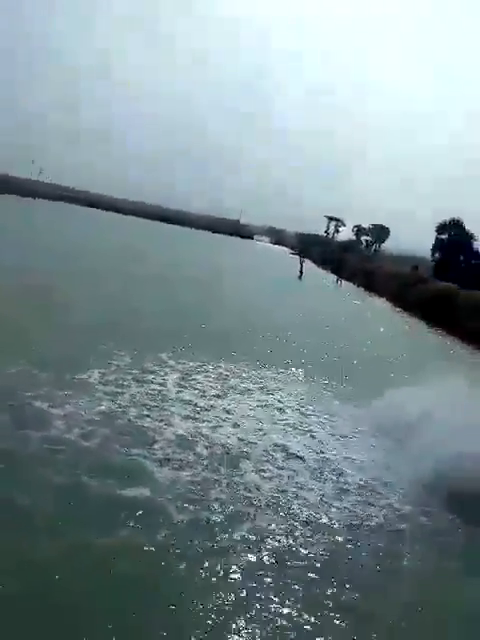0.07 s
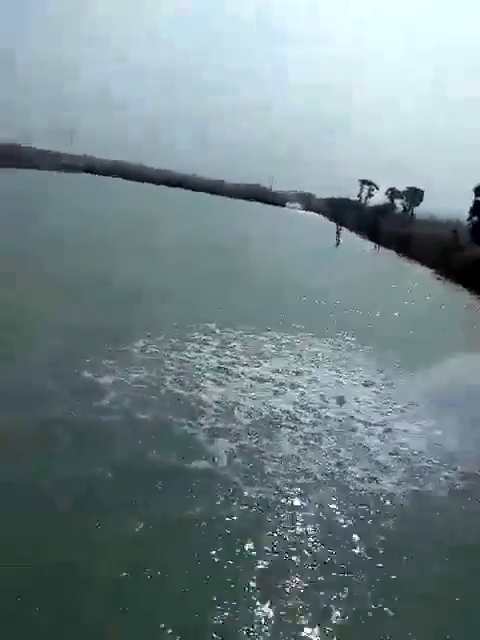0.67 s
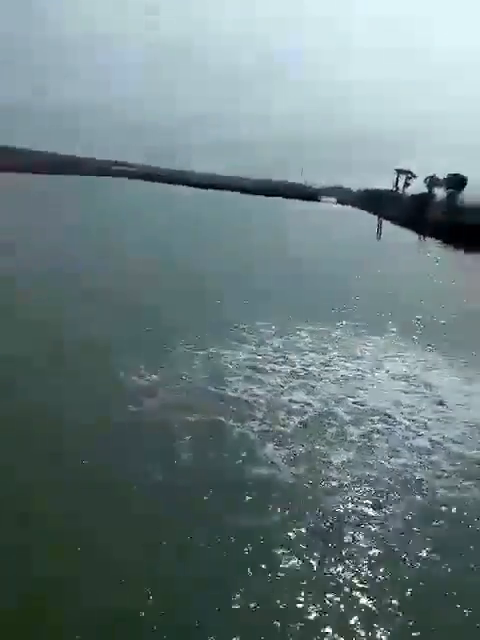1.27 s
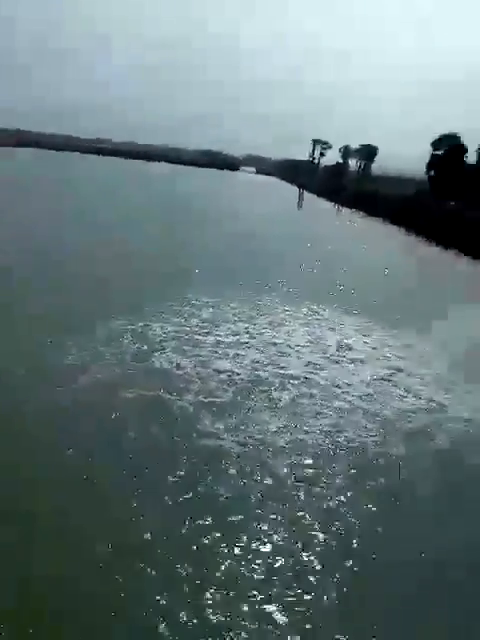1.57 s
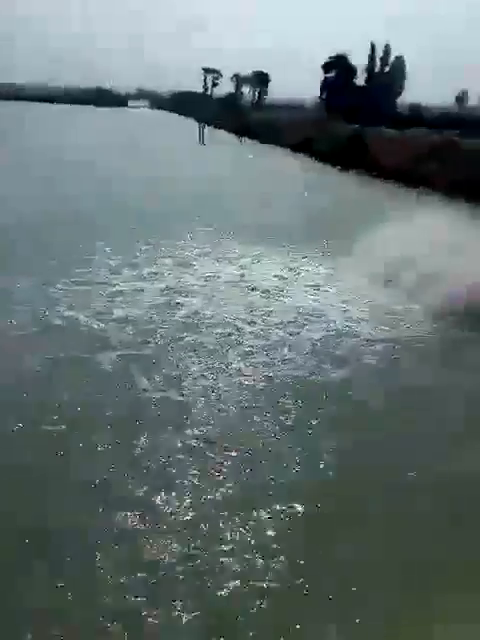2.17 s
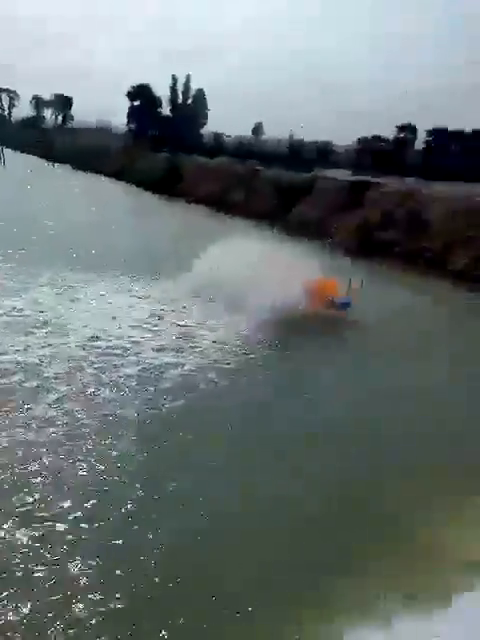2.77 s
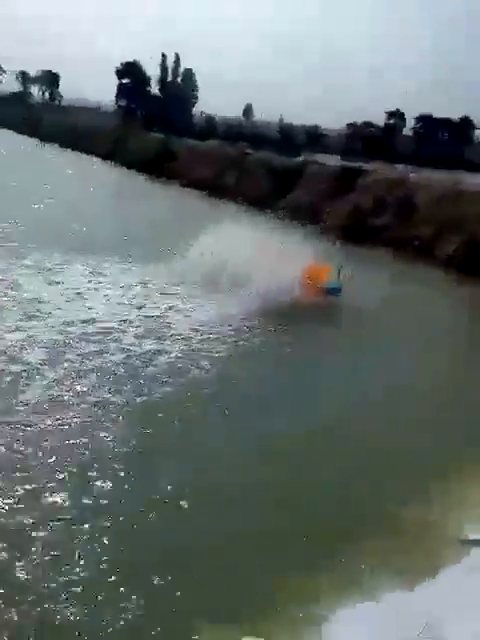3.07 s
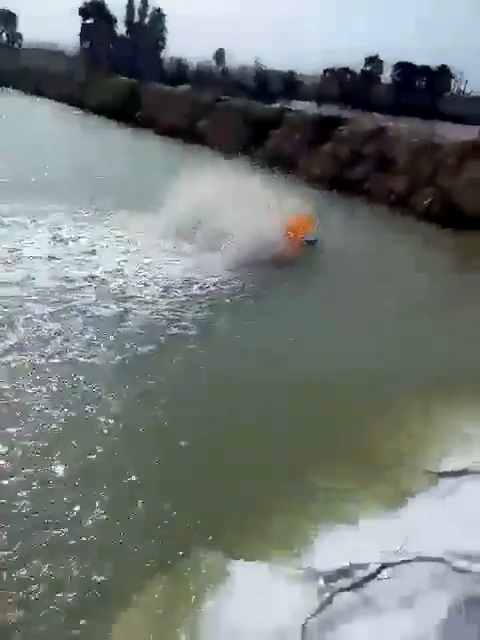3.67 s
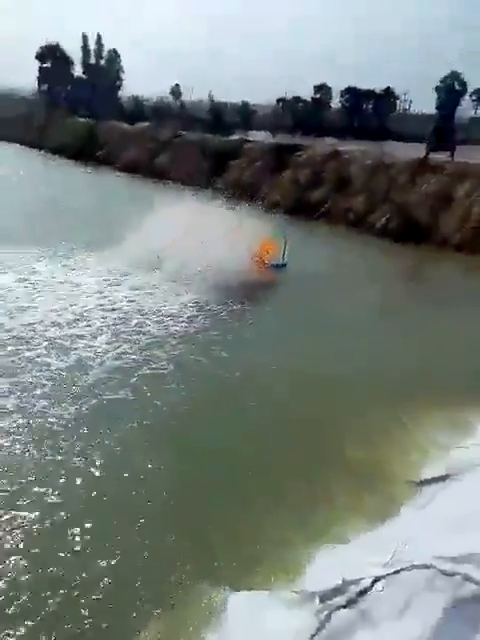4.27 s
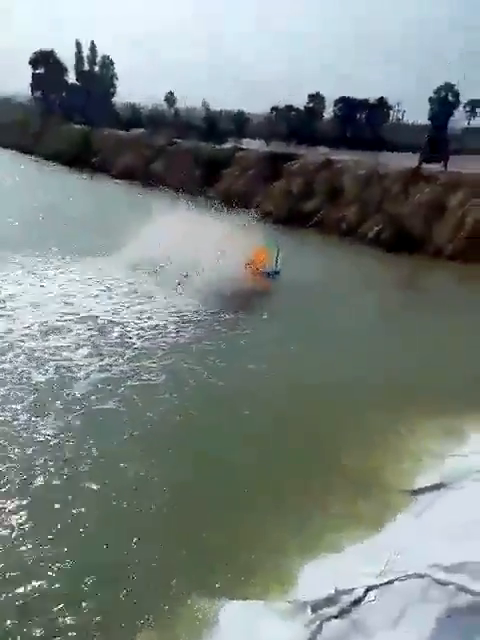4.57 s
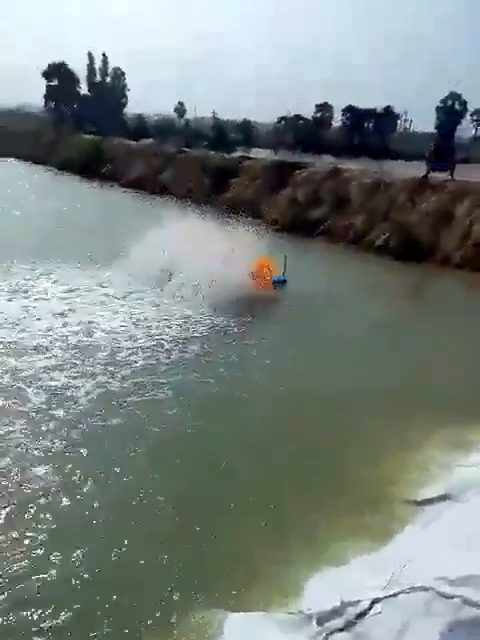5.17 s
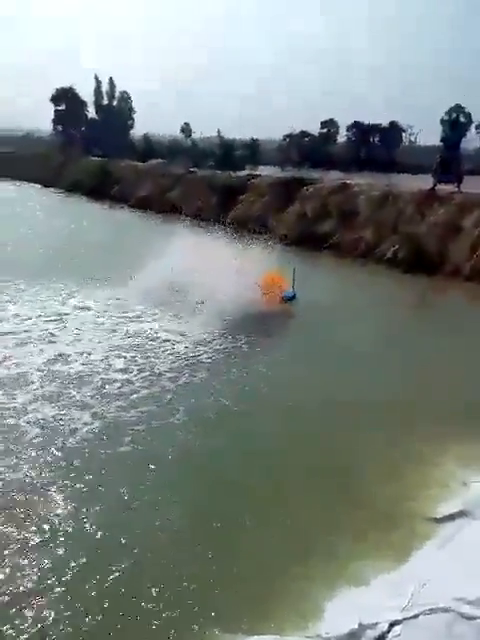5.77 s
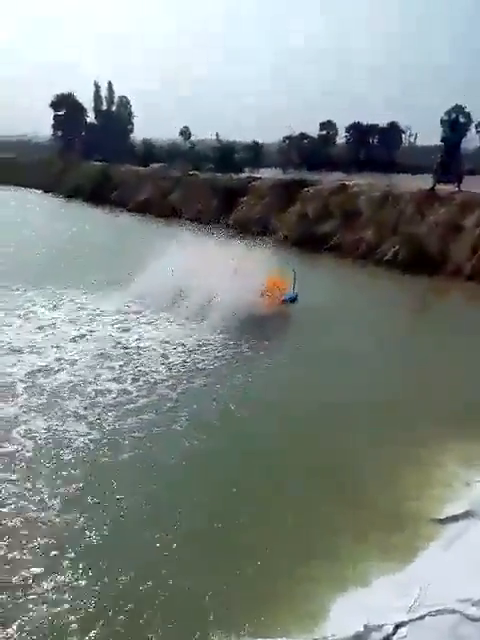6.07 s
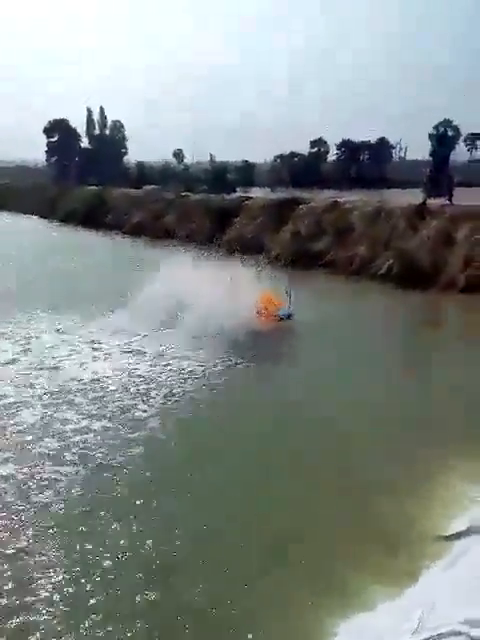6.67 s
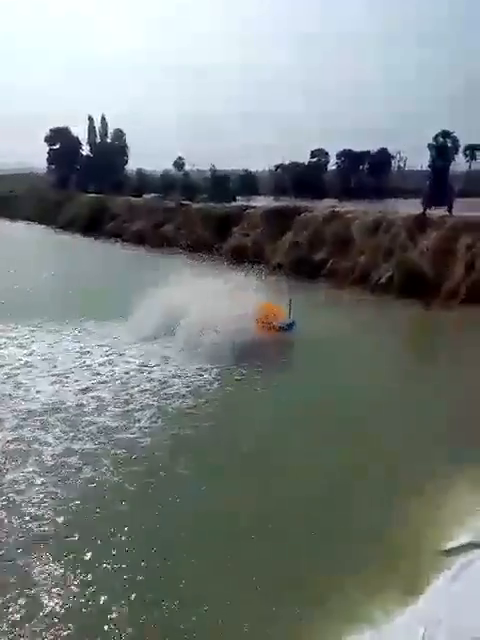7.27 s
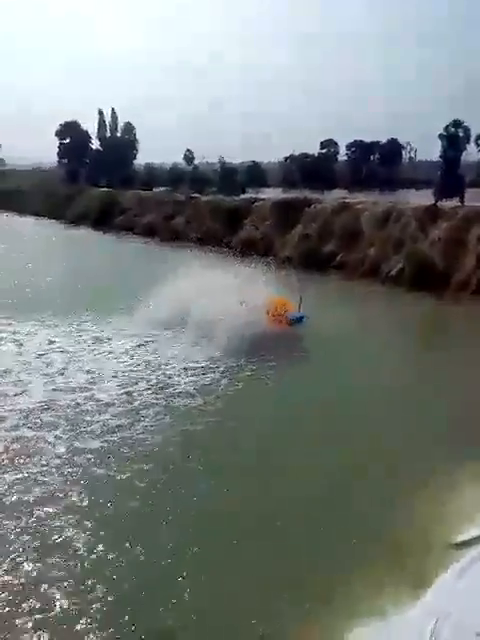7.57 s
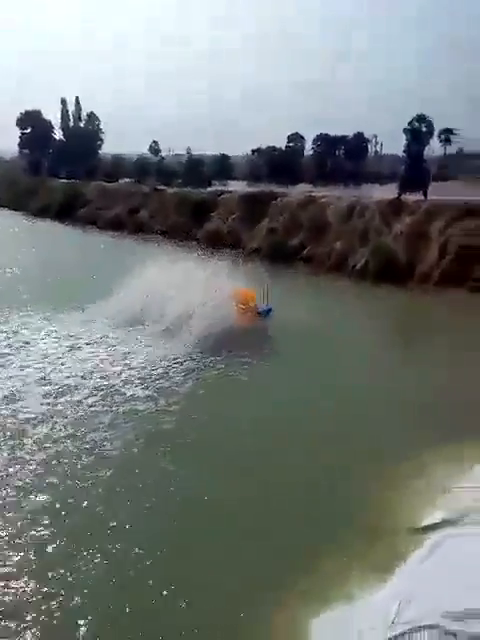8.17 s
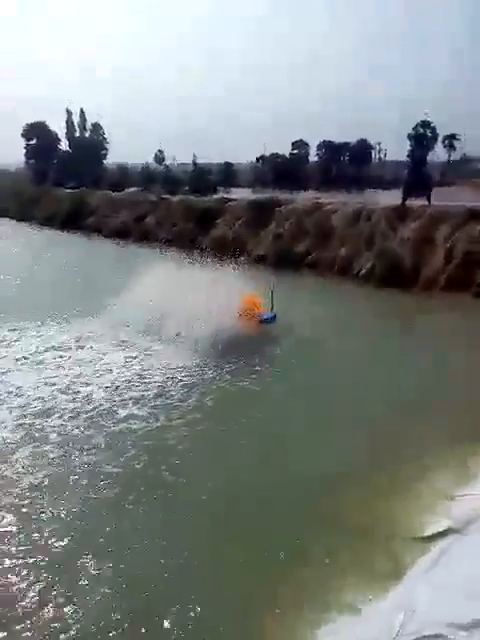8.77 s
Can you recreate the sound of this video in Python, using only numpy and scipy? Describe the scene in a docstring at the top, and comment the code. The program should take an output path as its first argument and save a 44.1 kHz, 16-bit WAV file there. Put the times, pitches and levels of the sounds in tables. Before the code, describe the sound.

Gusty wind rumbles and thuds on the microphone over the constant splashing and faint gear whine of a paddlewheel aerator.

```python
"""On the bank of a pond in strong wind, the microphone turning to a paddlewheel aerator on the water.
The paddles throw a steady hiss of spray and drops and beat in bubbles, over the whine of the gear drive.
Gusts buffet the microphone, hardest in the first three seconds, and the gain control ducks the water
under them."""
import sys
import numpy as np
from scipy import signal
from scipy.fft import rfft, irfft, next_fast_len
from scipy.io import wavfile
from scipy.ndimage import uniform_filter1d, map_coordinates

SR = 44100
rng = np.random.default_rng(int(sys.argv[2]) if len(sys.argv) > 2 else 0)


def pcm_store(signal):
    """Save signal as 16-bit PCM."""
    levels = np.round(np.clip(np.atleast_2d(signal), -1, 1) * 32767)
    wavfile.write(sys.argv[1], SR, levels.astype(np.int16).T)


N = 397341
TIME = np.arange(N) / SR


def amp(db):
    """Decibels to gain."""
    return 10 ** (np.asarray(db) / 20)


def unit_rms(x):
    """Scales to rms 1."""
    return x / np.sqrt(np.mean(x ** 2) + 1e-20)


def colour(x, spectrum):
    """Filters x by a spectrum drawn on a log-frequency axis; rms 1."""
    size = next_fast_len(N)
    hz, db = np.transpose(spectrum)
    gain = amp(np.interp(np.log(np.fft.rfftfreq(size, 1 / SR) + 1), np.log(hz), db))
    return unit_rms(irfft(rfft(x, size) * gain, size)[:N])


def wander(rate_hz):
    """Smooth random drift of rms 1 that moves up to about rate_hz."""
    step = 32
    size = N // step + 2
    hz = np.fft.rfftfreq(size, step / SR)
    slow = irfft(rfft(rng.standard_normal(size)) * np.exp(-(hz / rate_hz) ** 2), size)
    return np.interp(np.arange(N) / step, np.arange(size), unit_rms(slow))


def smooth(x, seconds):
    """Triangular running mean."""
    size = max(int(seconds * SR), 1)
    return uniform_filter1d(uniform_filter1d(x, size), size)


def lowpass(x, hz, order=2):
    """Butterworth low-pass."""
    return signal.sosfilt(signal.butter(order, hz, fs=SR, output="sos"), x)


def steady(x, seconds):
    """Takes out swells slower than the given time, leaving the quick ones."""
    return x / np.sqrt(abs(smooth(x ** 2, seconds)) + 1e-9)


def around(t, length):
    """The samples within three lengths of time t."""
    return slice(max(int((t - 3 * length) * SR), 0), int((t + 3 * length) * SR))


def wind_pressure(rise_share=0.47, steepness=4.5):
    """Wind level in dB at the microphone: each gust swells, holds and dies away on the mean wind."""
    # mean wind, strong at first, then a light breeze: t/s, level/dB
    breeze = [(0, -22), (.1, -19), (.15, -10), (.68, -11), (.77, -17), (.9, -10), (2.7, -10), (3.0, -18),
              (3.7, -24), (3.78, -45), (4.4, -37), (4.65, -29), (5.6, -29), (6.5, -38), (7.8, -42),
              (8.0, -27.5), (8.7, -34), (9.01, -22.5)]
    # gusts: crest t/s, level/dB, length/s
    gusts = [(0.176, -5, 0.089), (.42, -3, 0.04), (0.515, -3.5, 0.069), (0.842, -5.5, 0.045),
             (1.105, -7, .06), (1.261, -5, 0.075), (1.515, -3, .14), (1.909, -3, 0.077), (2.009, -.5, 0.14),
             (2.279, -3.5, .13), (2.506, -4, 0.042), (2.61, -4.5, .06), (2.804, 0, 0.072),
             (3.01, -12, 0.049), (3.14, -9, 0.057), (3.272, -12.5, .05), (3.371, -12, 0.057),
             (3.553, -12, 0.081), (3.65, -11, 0.037), (3.729, -16, 0.028), (4.068, -19, 0.12),
             (4.341, -22, 0.094), (4.47, -19, 0.041), (4.567, -19.5, 0.083), (4.767, -14, .09),
             (4.969, -14.5, 0.091), (5.101, -16.5, 0.031), (5.207, -15, 0.0684), (5.35, -24, .13),
             (5.558, -21, 0.079), (5.709, -8, .07), (5.938, -11.5, 0.033), (6.001, -20, 0.052),
             (6.171, -17, 0.0587), (6.369, -15, 0.032), (6.428, -15, 0.051), (6.612, -19.5, .05),
             (6.694, -23.5, 0.023), (6.897, -19.5, 0.024), (6.99, -19.5, 0.087), (7.128, -18.5, .11),
             (7.547, -25.5, .15), (7.911, -20, 0.1), (8.098, -10.5, .04), (8.173, -19.5, .04),
             (8.319, -21, .19), (8.55, -17, 0.072), (8.909, -18.5, .15)]
    power = amp(np.interp(TIME, *np.transpose(breeze))) ** 2
    for t, db, length in gusts:
        span = around(t, length)
        age = TIME[span] - t
        from_crest = np.maximum(-age / rise_share, age / (1 - rise_share)) / length
        power[span] += (amp(db) / (1 + from_crest ** steepness)) ** 2
    return 10 * np.log10(power)


def wind(rumble_db=-1, flutter_db=-5, lumps_db=4.5, spurts_db=6, eddy_hz=38, spurt_hz=75):
    """Eddies hit the microphone in lumps; each spurt sweeps small ones past faster, louder and higher."""
    # large eddies: f/Hz, level/dB
    rumble_spectrum = [(10, -28), (33, -20), (60, -3.5), (105, 2.5), (200, -3.5), (320, -13), (480, -26),
                       (800, -44.5), (5000, -96)]
    # small eddies at middling speed: f/Hz, level/dB
    flutter_spectrum = [(60, -16.5), (180, 3), (300, -2.5), (480, -11), (750, -23), (1300, -40),
                        (4000, -68)]
    gust_db = wind_pressure()
    excess_db = gust_db + 12  # above a middling wind
    # lumps and spurts can outrun the mean wind only so far
    eddies = unit_rms(np.tanh(wander(eddy_hz)))
    spurts = unit_rms(np.tanh(unit_rms(0.6 * eddies + wander(spurt_hz)) / 2))
    large = colour(rng.standard_normal(N), rumble_spectrum)
    rumble = steady(large * amp(lumps_db * eddies), seconds=0.05)
    small = colour(rng.standard_normal(N), flutter_spectrum)
    speed = amp(1.46 * spurts + 0.05 * excess_db)
    swept = map_coordinates(small, [np.cumsum(speed)], order=3, mode="mirror")
    flutter = steady(swept * amp(spurts_db * spurts), seconds=0.032)
    return amp(gust_db) * (amp(rumble_db) * rumble + amp(flutter_db + 0.31 * excess_db) * flutter)


def buffets(thud_db=2, rasp_db=-3):
    """The hardest eddies thud on the microphone port and break up in rasps milliseconds long."""
    # single buffets: t/s, level/dB, length/s, relative rasp level/dB
    hits = [(0.207, -1.5, 0.0037, -16.5), (0.242, -3.5, 0.0029, -23), (0.415, -5, 0.0061, -19),
            (0.512, -6.5, .009, -24), (0.824, -3, 0.012, -20), (1.114, -7, 0.0065, -11),
            (1.177, -12, .007, -22), (1.409, -12.5, 0.0097, -15), (1.421, -8, 0.0058, 0),
            (1.442, -8.5, 0.016, -15), (1.459, -4, 0.0088, -10.5), (1.636, -22, 0.0023, -15),
            (2.011, 7.5, 0.007, -10.5), (2.138, -14, 0.0063, -10.5), (2.19, -5, 0.023, -15.5),
            (2.224, -11.5, 0.016, -11), (2.386, -9.5, 0.012, -31), (2.564, -7, 0.0041, -36),
            (2.643, -4.5, 0.0065, -25), (2.677, -4, 0.0045, -13.5), (2.796, -2, 0.0075, -8),
            (2.806, -10, 0.0057, 4), (2.833, -2.5, 0.006, -1.5), (3.566, -17, 0.021, -25),
            (5.703, -11, 0.013, -22), (5.736, -14, 0.0046, -21)]
    # the thud on the port: f/Hz, level/dB
    thud_spectrum = [(40, -10), (150, 3), (400, -0.5), (700, -10.5), (1100, -18), (2000, -48), (5000, -74)]
    # the eddy breaking up: f/Hz, level/dB
    rasp_spectrum = [(200, 1), (700, 3), (1500, 1.5), (3200, -12), (5000, -25), (7500, -56), (15000, -56)]
    push, breakup = np.zeros((2, N))
    for t, db, length, harsh_db in hits:
        span = around(t, length)
        swell = amp(db) / (1 + (2 * (TIME[span] - t) / length) ** 4)
        push[span] += swell
        breakup[span] += amp(harsh_db) * swell
    thud = steady(colour(rng.standard_normal(N), thud_spectrum), seconds=0.0031)
    rasp = colour(rng.standard_normal(N), rasp_spectrum)
    return amp(thud_db) * push * thud + amp(rasp_db) * breakup * rasp


def shoves():
    """Subsonic pressure swells in the heaviest gusts and pulls the gain control down."""
    # slow shoves of air: t/s, level/dB, half length/s
    swells = [(0.228, -5, .02), (0.43, -13, 0.022), (0.54, -8, 0.02), (1.481, -5, 0.023), (2.02, -3, 0.045),
              (2.797, -14, 0.06), (3.665, -11.5, 0.02), (5.709, -9.5, 0.034), (5.939, -11.5, 0.029),
              (8.1, -7.5, .025)]
    return sum(amp(db) * np.exp(-((TIME - t) / half) ** 2) for t, db, half in swells)


def gearbox(waver_db=2):
    """Gear tones waver as the paddles load the motor."""
    # whine of the drive: f/Hz, level/dB, rms pitch drift/Hz
    tones = [(306.7, -39, 3.28), (568, -54, 5.97), (599, -51, 5.76), (613, -50, 4.987), (926, -58, 5.66)]
    whine = np.zeros(N)
    for hz, db, drift_hz in tones:
        turns = np.cumsum(hz + drift_hz * wander(12.04)) / SR
        whine += amp(db + waver_db * wander(21)) * np.sqrt(2) * np.sin(2 * np.pi * turns)
    return whine


def bubbles(level_db=-49, per_s=260, cycles=9, rise=0.15, sizes=28):
    """Air beaten into the pond rings as bubbles, each brief and rising in pitch."""
    fizz = np.zeros(N)
    for hz in np.geomspace(600, 3600, sizes):
        age = np.arange(int(4 * cycles * SR / hz)) * hz / SR / cycles  # in ring times
        ring = np.sin(2 * np.pi * cycles * age * (1 + rise * age / 2)) * np.exp(-2 * age)
        births = np.zeros(N)
        at = rng.integers(0, N, int(per_s * N / SR / sizes))
        births[at] = amp(2.3 * np.minimum(rng.exponential(1, len(at)), 4))
        fizz += signal.oaconvolve(births, ring)[:N]
    return amp(level_db) * unit_rms(fizz)


def close_echoes(x, near_db=-18.5, far_db=-13):
    """Two surfaces close to the moving microphone return dulled copies that hollow the sound."""
    # echo delays: t/s, nearer lag/s, farther lag/s
    delays = [(1.3, .00103, .00140), (2.3, .00082, .00143), (3.6, .00087, .00144), (6.4, .00089, .00144),
              (7.3, .00103, .00155)]
    times, *lags = np.transpose(delays)
    dulled = lowpass(x, 8000)
    for db, lag in zip((near_db, far_db), lags):
        late = np.arange(N) - np.interp(TIME, times, lag) * SR
        x = x + amp(db) * map_coordinates(dulled, [late], order=1)
    return x


def drops(per_s, spread_db):
    """Impacts of countless drops, most tiny and a few large."""
    size = amp(spread_db * np.minimum(rng.exponential(1, N), 5))
    return unit_rms(size * rng.choice([-1, 1], N) * (rng.random(N) < per_s / SR))


def paddle_spray(wash_db=-2, mist_db=-17, surge_db=1.09, patter_db=0.46):
    """Sheets of water thrown by the paddles fall as drops, a hiss from the bank."""
    # falling spray and churned water: f/Hz, level/dB
    spray_spectrum = [(60, 6), (250, 8.5), (480, -1), (700, 0), (1250, -1), (1620, -4), (1950, -6.5),
                      (2450, -13.5), (3200, -6), (4100, -10.5), (5500, -7), (6500, -3), (8100, -15.5),
                      (9700, -17)]
    # fine, bright mist at the top of the spray: f/Hz, level/dB
    mist_spectrum = [(8000, -29), (10500, -16), (12000, 3.5), (13800, -6), (14600, 11), (16000, 6)]
    # as the microphone turns to the wheel: t/s, level/dB, treble tilt/dB
    facing = [(0, -36, 2), (0.75, -32.5, -2), (1.3, -34, -3.5), (2.5, -30.5, -4.5), (3.1, -37.5, 2.5),
              (4, -35, 0), (5.5, -35.5, 0.5), (7, -35, 0.5), (9.02, -33.5, 0.5)]
    # heavier sheets landing: t/s, rise/dB, half length/s
    sloshes = [(0.08, 1.5, .04), (0.777, 3, 0.025), (7.743, 3.5, 0.01)]
    times, *columns = np.transpose(facing)
    level_db, tilt_db = (np.interp(TIME, times, column) for column in columns)
    fall = drops(per_s=4500, spread_db=2) + amp(wash_db) * rng.standard_normal(N)
    water = lowpass(colour(fall, spray_spectrum), 10520, order=6)
    water += amp(mist_db) * colour(drops(per_s=6500, spread_db=3.3), mist_spectrum)
    # the churned body and the bright spray surge each on their own
    body = lowpass(water, 2300, order=1)
    bright = water - body
    water = body * amp(1.03 * wander(48)) + bright * amp(tilt_db + 0.47 * wander(16))
    slosh_db = sum(db * np.exp(-((TIME - t) / half) ** 2) for t, db, half in sloshes)
    return water * amp(level_db + slosh_db + surge_db * wander(2.1) + patter_db * wander(70))


def scene():
    """One microphone on the bank: the aerator out on the pond, the wind right on the port."""
    aerator = close_echoes(paddle_spray()) + bubbles() + gearbox()
    return (aerator + wind() + buffets() + shoves())[None]


def record(dry, threshold_db=-14.5, recovery_db_per_s=110, ceiling=0.85, low_hz=24, top_hz=15530):
    """Gain control ducks at loud gusts and soon recovers; then a low cut, rounded peaks and a top cut."""
    power_db = 10 * np.log10(abs(smooth(dry[0] ** 2, seconds=0.019)) + 1e-12)
    recovery = TIME * recovery_db_per_s
    held_db = np.maximum.accumulate(power_db + recovery) - recovery
    over_db = np.maximum(held_db - threshold_db, 0)
    ducked = dry[0] * amp(-0.75 * smooth(over_db, seconds=0.008))  # 4:1 compression
    low_cut = signal.butter(4, low_hz, "highpass", fs=SR, output="sos")
    ducked = signal.sosfilt(low_cut, ducked)
    rounded = ducked / (1 + (ducked / ceiling) ** 6) ** (1 / 6)
    top_cut = signal.firwin(1023, top_hz, window=("kaiser", 9), fs=SR)
    return signal.oaconvolve(rounded, top_cut, "same")[None]


dry = scene()
out = record(dry)
pcm_store(out)
```